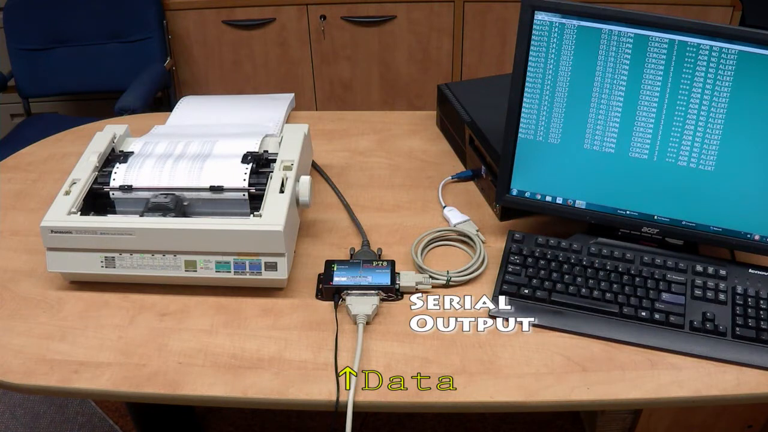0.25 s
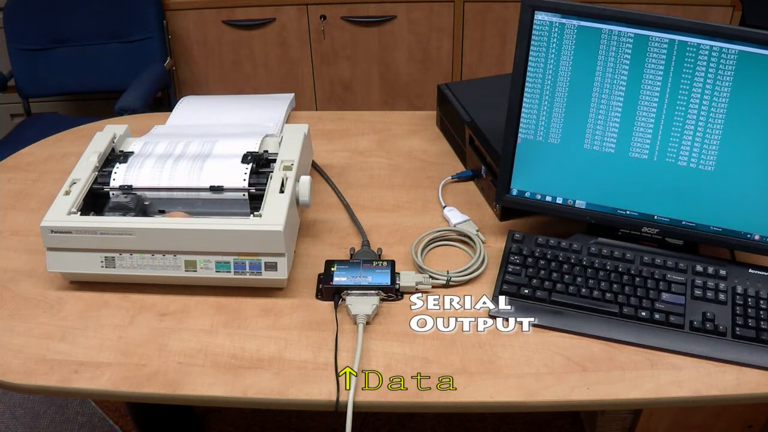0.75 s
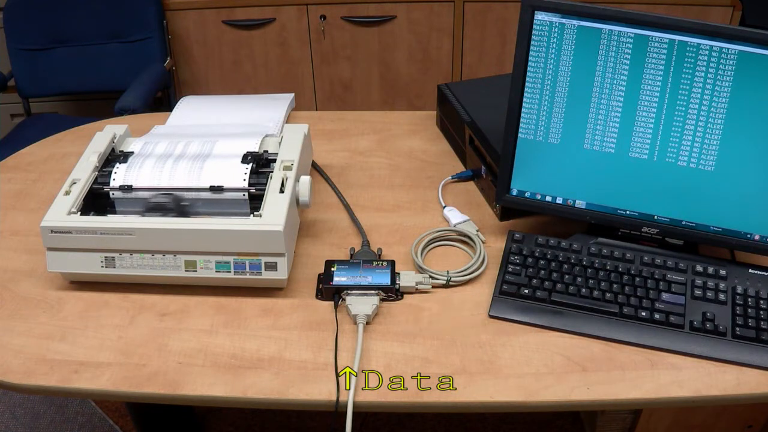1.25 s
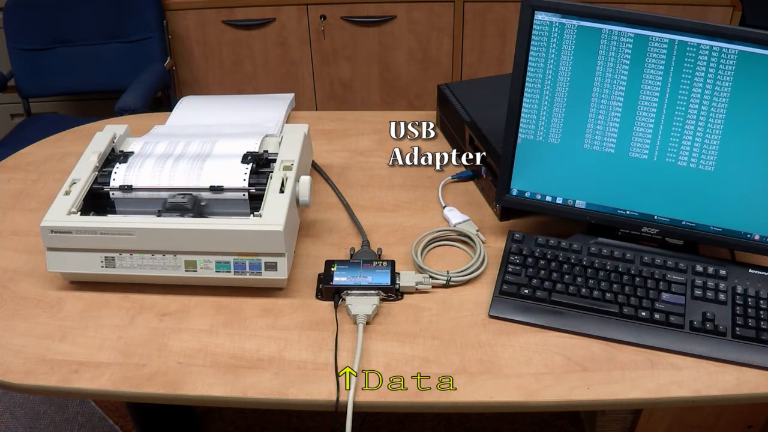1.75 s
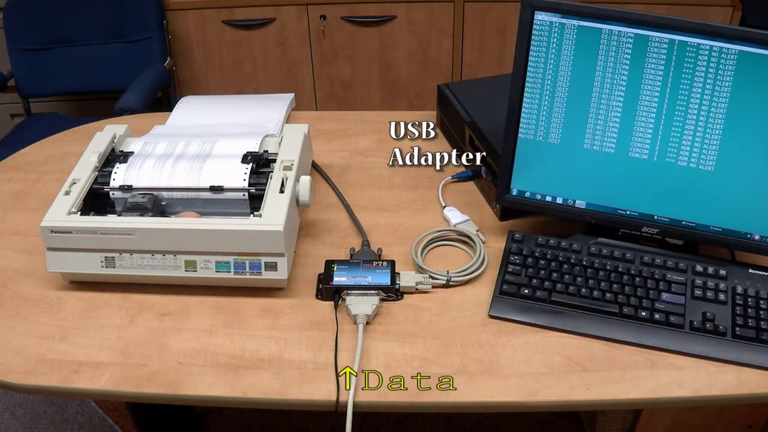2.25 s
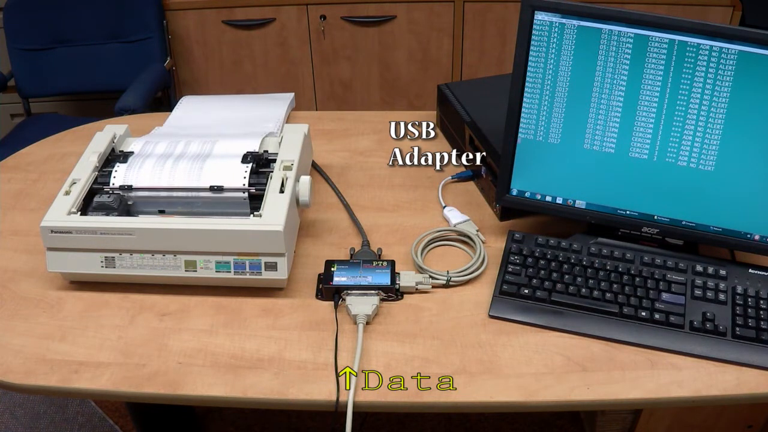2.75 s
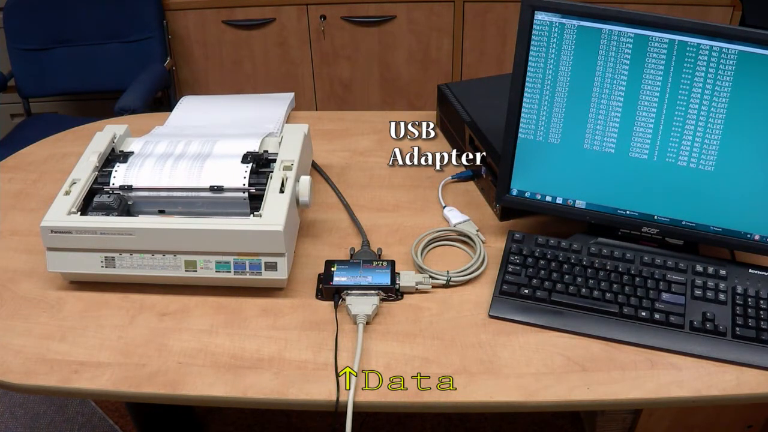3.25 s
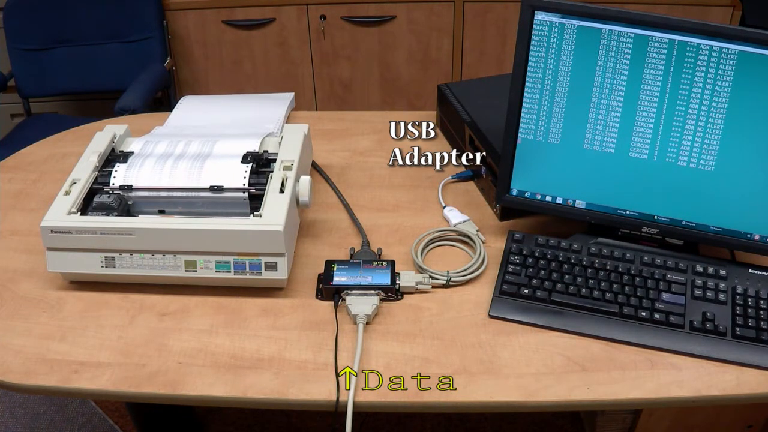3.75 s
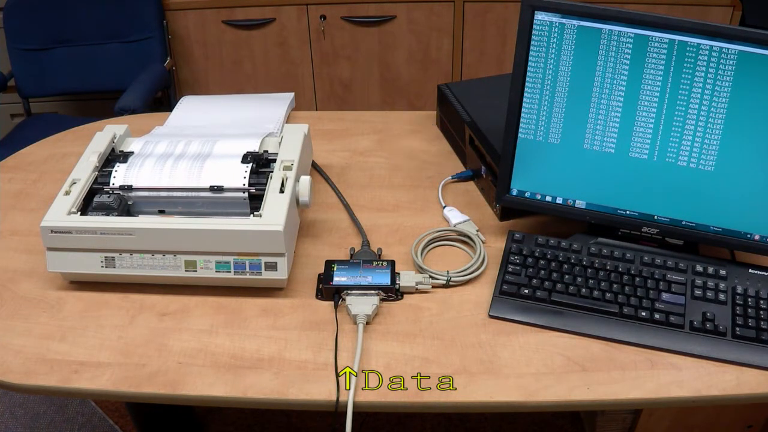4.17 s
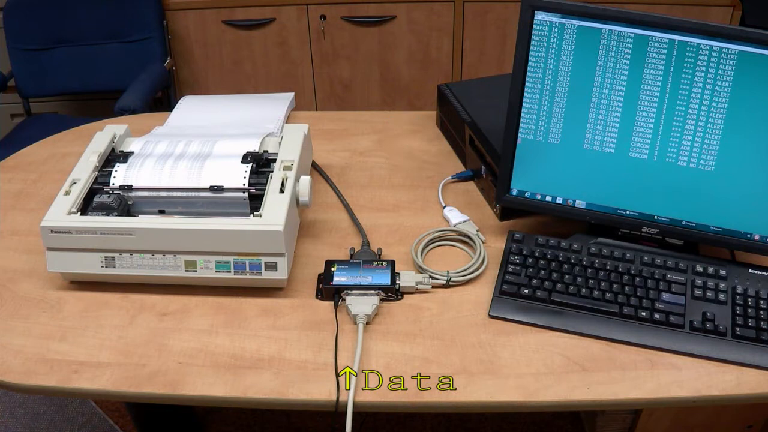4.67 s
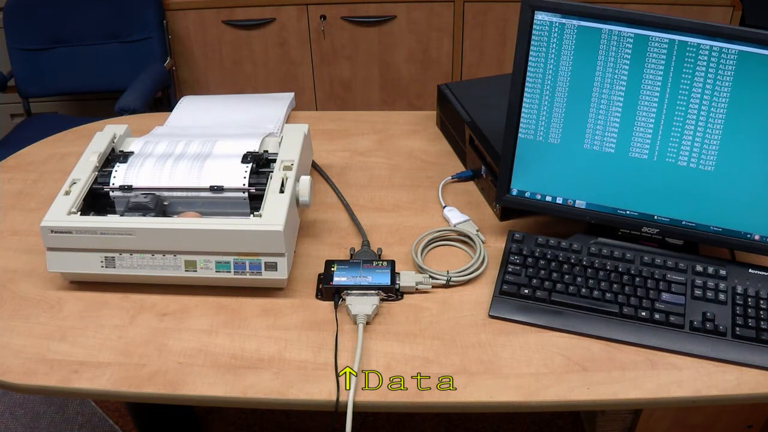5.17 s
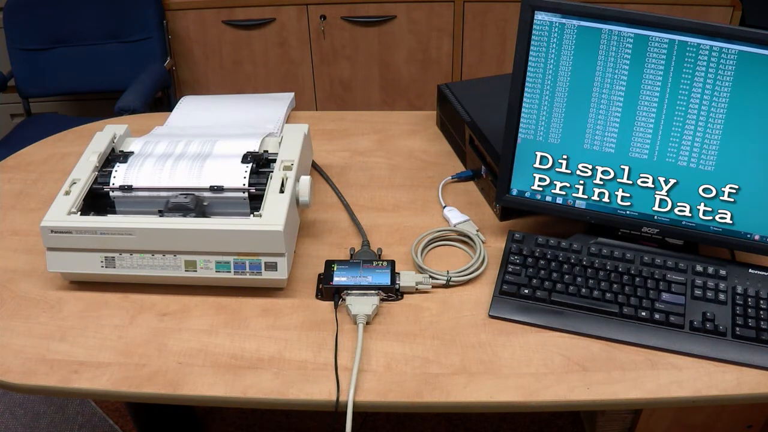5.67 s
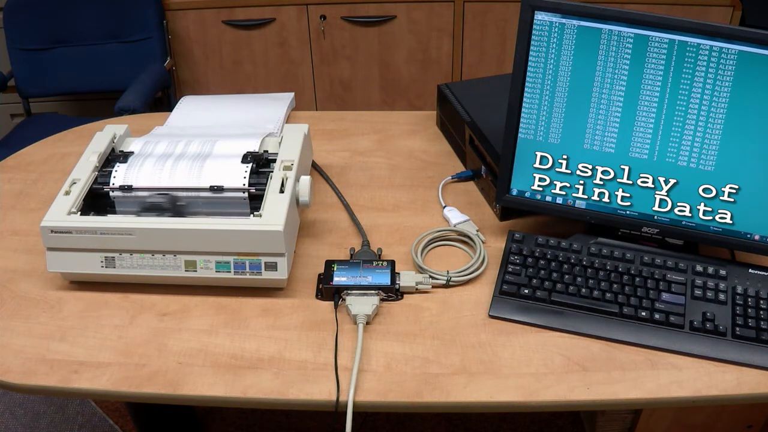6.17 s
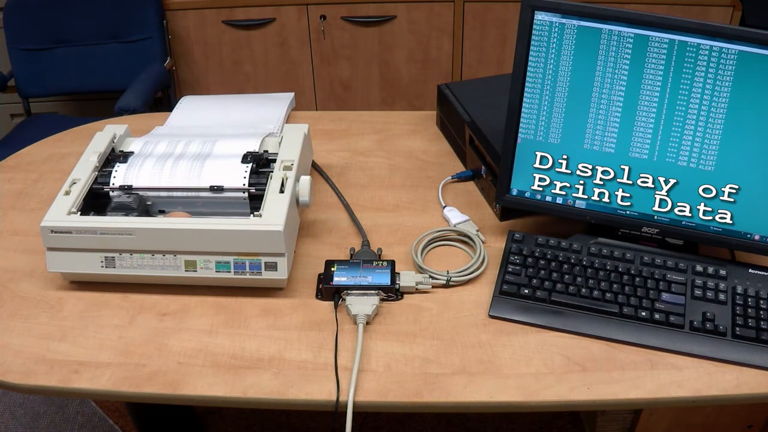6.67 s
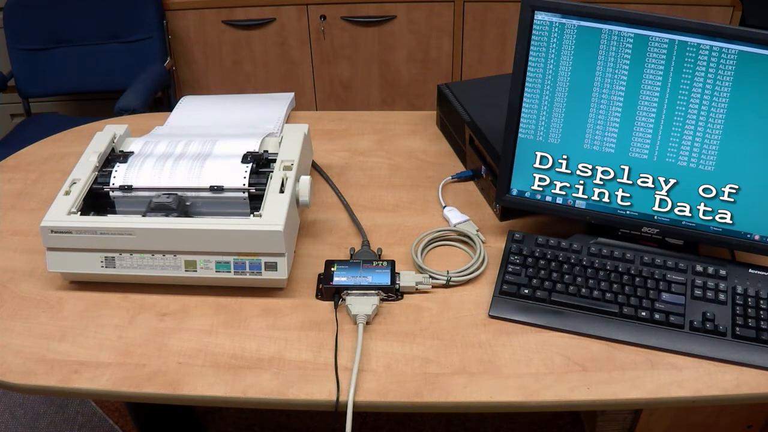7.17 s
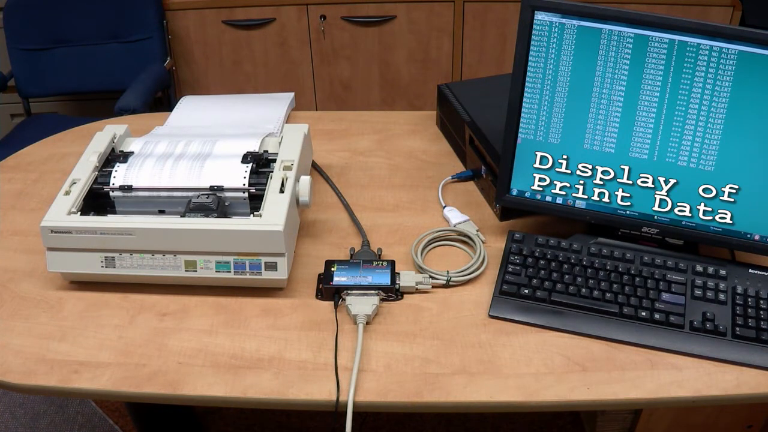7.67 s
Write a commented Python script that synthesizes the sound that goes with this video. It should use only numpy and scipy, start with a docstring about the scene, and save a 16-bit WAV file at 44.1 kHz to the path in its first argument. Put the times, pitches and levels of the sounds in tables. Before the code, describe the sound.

A dot matrix printer, slightly left in a small office, prints two lines in shrill buzzing word-length bursts over a steady motor hum. Between them the carriage runs back with a thud, rustle and higher whine. After the second line only ventilation and faint mains hum remain for about two seconds; then two more lines follow with another heavier return, ending on a thud and clicks. Close stereo microphone, short room reverb, level ducking under the loud pins.

```python
"""Pins of a dot matrix printer, left of centre, hammer out four lines of text over a humming carriage stepper.
After the first and third lines the carriage runs back with rustle and drone; its starts, turns and stops thud in
the chassis and desk, with small plastic ticks. Ventilation noise and mains hum run throughout and fill the pause
after the second line. The room answers the printer; a gain control lowers the level while the pins are loud."""
import sys
import numpy as np
from scipy import signal
from scipy.fft import rfft, irfft, next_fast_len
from scipy.io import wavfile
from scipy.ndimage import uniform_filter1d, minimum_filter1d, map_coordinates

SR = 44100
rng = np.random.default_rng(int(sys.argv[2]) if len(sys.argv) > 2 else 0)


def materialize(psi):
    """Save the field psi as 16-bit PCM at rate SR to the path in sys.argv[1].

    A 1-D psi becomes a single channel; in a 2-D psi each row is a channel.
    """
    bounded = np.clip(np.atleast_2d(psi).T, -1, 1)
    quanta = np.round(bounded * 32767).astype(np.int16)
    wavfile.write(sys.argv[1], SR, quanta)


N = 350154
T = np.arange(N) / SR


def amp(db):
    """Gain of a level in dB."""
    return 10 ** (np.asarray(db) / 20)


def unit(x):
    """Scaled to rms 1."""
    return x / np.sqrt(np.mean(x ** 2) + 1e-20)


def along(points, hz):
    """(freq_hz, value) points read on a log frequency axis."""
    f, v = np.transpose(points)
    return np.interp(np.log(hz + 1), np.log(f + 1), v)


def wobble(knots_per_s):
    """A smooth random curve through normal random knots."""
    knots = rng.standard_normal(2000)
    return map_coordinates(knots, [T * knots_per_s])


def filtered(x, response):
    """x times a complex response of frequency."""
    m = next_fast_len(N + 8192)
    return irfft(rfft(x, m) * response(np.fft.rfftfreq(m, 1 / SR)), m)[..., :N]


def struck(x, spectrum):
    """x through the minimum-phase response of energy 1 with this colour."""
    cep = irfft(np.log(amp(along(spectrum, np.fft.rfftfreq(4096, 1 / SR))) + 1e-4))
    cep[1:2048] *= 2  # fold the cepstrum: causal
    cep[2049:] = 0
    h = irfft(np.exp(rfft(cep)))
    return signal.fftconvolve(np.atleast_2d(x), h[None] / np.linalg.norm(h), axes=1)[:, :N]


def pulses(times_s, sizes):
    """Sharp pulses placed between samples by a windowed sinc."""
    at = times_s[:, None] * SR
    taps = np.floor(at) + np.arange(-7, 9)
    shape = np.sinc(taps - at) * np.cos(np.pi * (taps - at) / 17) ** 2
    index = np.clip(taps, 0, N).astype(int)
    return np.bincount(index.ravel(), (sizes[:, None] * shape).ravel(), N + 1)[:N]


def noise(spectrum, channels=1):
    """Coloured noise of rms 1."""
    white = rng.standard_normal((channels, N))
    return unit(filtered(white, lambda hz: amp(along(spectrum, hz))))


COLUMN_HZ = 1925.7
CHARACTER_COLUMNS = 30
EDGE_DIP_DB, EDGE_SHARE = 2, .25  # fewer dots where two characters meet
WEIGHT_DB, COLOUR_DB = 2.17, 3  # spread of ring and of knocks from character to character
TRAIL_S, TRAIL_DB = .012, -8.5  # rear pins finish after the front ones
FIRST_DB, FIRST_S = -1, 0.002  # softer first columns: offset, decay time constant
# printed words and marks; knocks on every and every second column:
# start_s, end_s, pin_ring_db, every_knock_db, second_knock_db, guide_ring_db
PRINTED_WORDS = [(0, 0.047, -26, -52.5, -53, -44.5), (0.062, 0.111, -27.5, -50.5, -55.5, -50.5),
                 (0.155, .171, -24, -52, -52, -48), (0.198, .278, -22.5, -51.5, -47, -50.5),
                 (0.272, .3, -26.5, -52, -47.5, -54.5), (.371, .434, -22.5, -60, -44, -49.5),
                 (0.436, 0.449, -25, -55.5, -48, -49), (0.45, 0.529, -22.5, -46.5, -50.5, -49),
                 (0.651, 0.707, -21.5, -49.5, -45.5, -55.5), (0.737, .741, -25, -49, -52, -61),
                 (.747, .775, -24, -47, -58.5, -54.5), (0.794, 0.802, -28.5, -52.5, -55.5, -57.5),
                 (0.799, 0.874, -24, -51.5, -53.5, -48.5), (1.572, 1.653, -24.5, -59, -52, -52),
                 (1.672, 1.711, -24.5, -49, -49.5, -55.5), (1.713, 1.764, -24, -51, -51.5, -52.5),
                 (1.78, 1.824, -23.5, -46.5, -50.5, -52), (1.873, 1.885, -19, -47.5, -41, -45),
                 (1.915, 2.013, -24, -53.5, -48, -45.5), (2.089, 2.148, -21, -48.5, -46, -46),
                 (2.159, 2.254, -23, -46.5, -55, -52), (2.37, 2.431, -22.5, -55.5, -48, -62),
                 (2.454, 2.459, -22, -53, -66, -60), (2.464, 2.471, -22.5, -40, -47, -50.5),
                 (4.841, 4.886, -24, -62.5, -70, -73), (4.887, 4.924, -27.5, -63.5, -59, -53.5),
                 (4.939, 4.977, -29, -60, -61.5, -60), (5.001, 5.065, -28.5, -55.5, -62, -55.5),
                 (5.187, 5.218, -24.5, -60, -66, -59), (5.224, 5.265, -25.5, -57, -61.5, -61),
                 (5.269, 5.347, -25, -59, -54, -50.5), (5.421, 5.525, -23, -53, -53, -48.5),
                 (5.548, 5.564, -22, -56, -50.5, -44.5), (5.611, 5.657, -20, -39.5, -59.5, -41.5),
                 (5.676, 5.724, -20, -43, -52.5, -44), (5.732, 5.768, -21.5, -47, -51, -56),
                 (5.775, 5.86, -21, -54, -45.5, -54.5), (6.567, 6.6, -23, -65, -63, -55),
                 (6.604, 6.651, -27, -63.5, -57, -59), (6.665, 6.695, -27.5, -65.5, -56.5, -63),
                 (6.728, 6.787, -28, -61, -60, -58), (6.912, 6.955, -27.5, -64.5, -61.5, -69),
                 (6.959, 7.072, -25, -51.5, -59.5, -50.5), (7.147, 7.246, -23, -55.5, -55.5, -48.5),
                 (7.271, 7.288, -27, -58.5, -53, -60), (7.336, 7.384, -24.5, -49, -65.5, -46),
                 (7.391, 7.444, -20.5, -49, -49, -48.5), (7.459, 7.488, -20, -55.5, -51, -52),
                 (7.502, 7.58, -21, -50.5, -47, -52)]


def text(times_s):
    """Gains of ring and knocks per column: words of equal character cells, with a weak trail."""
    gains = np.zeros((4, len(times_s)))
    weights = rng.standard_normal((len(PRINTED_WORDS), 4, 12))
    spread_db = np.c_[[WEIGHT_DB, COLOUR_DB, COLOUR_DB, COLOUR_DB]]
    for (start, end, *db), weight in zip(PRINTED_WORDS, weights):
        on = (times_s >= start) & (times_s < end + TRAIL_S)
        t = times_s[on]
        cells = (t - start) * COLUMN_HZ / CHARACTER_COLUMNS
        edge = np.clip((cells % 1 - 1 + EDGE_SHARE) / EDGE_SHARE, 0, 1)
        shape_db = FIRST_DB * np.exp((start - t) / FIRST_S)
        shape_db = shape_db - EDGE_DIP_DB * np.sin(np.pi * edge) + TRAIL_DB * (t >= end)
        gains[:, on] = amp(np.add.outer(db, shape_db) + spread_db * weight[:, cells.astype(int)])
    return gains


# pin and head ring colour: freq_hz, density_db
HEAD_RING = [(1200, -36), (2500, -28.5), (4000, -22.5), (5200, -15), (6400, -13.5), (7200, -6.5),
             (7800, -0.5), (8500, -7), (9600, -10.5), (11000, -12), (12500, -11.5), (14000, -12.5),
             (16000, -17.5)]
# platen knock colour: freq_hz, level_db
PLATEN_KNOCK = [(300, -10.5), (640, -6), (1000, -3), (1400, 0.5), (1930, -2.5), (2400, 3), (2890, -11.5),
                (3400, -1), (3850, 1), (6000, -16.5)]
# paper guide ring colour: freq_hz, level_db
PAPER_GUIDE = [(2000, -39), (2650, -15.5), (2880, 6.5), (3100, -18.5), (4000, -43)]
FLIGHT_JITTER_S, REBOUND_S = 1.9e-5, 0.0014


def pins():
    """Pins fire on the column clock, as many as the letter shapes need; each rattles as it rebounds."""
    times_s = np.arange(int(N / SR * COLUMN_HZ)) / COLUMN_HZ
    ring, every, second, guide = text(times_s)
    per_column = np.sqrt(SR / COLUMN_HZ)
    draw = rng.standard_normal((len(times_s), 6))
    # upright strokes fire many pins at once, never more than the head has
    stroke_db = 3.2 * np.tanh(1.5 * unit(uniform_filter1d(draw[:, 0], size=3)))
    fired = ring * amp(stroke_db) * per_column

    # unequal flight times blur the clock's upper overtones
    flight_s = FLIGHT_JITTER_S * draw[:, 1]
    force = 1 + 0.55 * np.tanh(0.27 * draw[:, 2])
    blows = amp(4.5) * pulses(times_s + flight_s, fired * force)
    spread = signal.lfilter([1], [1, -np.exp(-1 / (REBOUND_S * SR))], pulses(times_s, fired))
    shared, *own = rng.standard_normal((3, N))
    # rattling parts face the two ports differently
    rattle = amp(-14.5) * spread * (shared + 0.58 * np.array(own))

    # a pin cannot fire on neighbouring columns: flat strokes beat at half the clock,
    # letter shapes shift the beat by one column now and then
    parity = np.cumprod(np.where(draw[:, 4] < 1.7, -1, 1))
    beat = amp(12.5) * every + amp(16) * second * parity
    uneven = amp(12.0) * np.hypot(every, second) * draw[:, 3]
    knock = struck(pulses(times_s, per_column * (beat + uneven)), PLATEN_KNOCK)
    flutter = parity + 1.3 * draw[:, 5]
    sheet = struck(pulses(times_s, per_column * amp(-1.5) * guide * flutter), PAPER_GUIDE)
    return struck(blows + rattle, HEAD_RING) + knock + sheet


# carriage stepper passes: start_s, end_s, step_rate_hz, hum_db, whine_db, whirr_db
CARRIAGE_PASSES = [(-.1, 0.981, 648.6, -51, -78, -53), (1.097, 1.44, 485, -54, -53.5, -55),
                   (1.481, 2.584, 648, -49.5, -81.5, -52.5), (4.76, 5.964, 628.3, -46.5, -75, -52),
                   (6.04, 6.433, 482, -50.5, -52.5, -53), (6.458, 7.695, 652.4, -47, -76, -53.5)]
# gear whirr colour: freq_hz, density_db
GEAR_WHIRR = [(120, -22.5), (200, -3.5), (400, -1.5), (800, -8.5), (1500, -19.5), (3000, -33),
              (6000, -21.5), (9000, -22), (14000, -37.5)]
# belt and ribbon rustle colour, also weights the whine overtones: freq_hz, density_db
BELT_RUSTLE = [(700, -28.5), (1400, -9.5), (2400, -10.5), (3500, -16), (5500, -13.5), (8000, -4),
               (9900, -10), (13900, -10.5), (15500, -24.5)]
PULL_DB, PULL_S = 3, .08  # louder hum while getting up to speed: boost, decay time constant
RAMP_S, BRAKE_S, BRAKE_SHARE = 0.0067, 0.05, .18


def stepper():
    """Motor hum at the step rate, a whine of step overtones 12 to 18, and gear whirr."""
    out = np.zeros(N)
    drift_rad, swell, whirr = 0.59 * wobble(25), amp(2.2 * wobble(9.1)), noise(GEAR_WHIRR)[0]
    orders = np.arange(18, 11, -1)
    for start, end, hz, hum_db, whine_db, whirr_db in CARRIAGE_PASSES:
        at = (T > start) & (T < end)
        t = T[at]
        on = np.clip(np.minimum(t - start, end - t) / RAMP_S, 0, 1)
        speed = 1 - BRAKE_SHARE * np.clip(1 - (end - t) / BRAKE_S, 0, 1)  # brakes at the end
        step = np.exp(1j * (2 * np.pi * hz * np.cumsum(speed) / SR + drift_rad[at]))
        hum = step + amp(-24.0) * step ** 2 + amp(-27) * step ** 3
        whine = step ** 12 * np.polyval(amp(along(BELT_RUSTLE, hz * orders)), step)
        hum_gain = amp(hum_db + PULL_DB * np.exp((start - t) / PULL_S))
        tone = (hum_gain * hum + amp(whine_db) * whine).real
        out[at] += on * (swell[at] * tone + amp(whirr_db) * whirr[at])
    return out


# ventilation colour: freq_hz, density_db
VENT_AIR = [(15, -28), (30, -15), (45, -18.5), (59, -6), (74, -12), (93, -7), (110, -13), (132, 0),
            (185, -14), (300, -20.5), (500, -27.5), (950, -37), (1300, -47), (2500, -62)]
VENT_DB = -46.5
# left-right likeness of the ventilation: freq_hz, correlation
VENT_LIKENESS = [(60, 1), (240, 0.81), (950, 0.43), (3770, 0.07), (15000, 0.01)]
# mains hum overtones: freq_hz, level_db
MAINS_HUM = [(240, -58.5), (360, -64.5)]


def ventilation():
    """Noise rumble, nearly mono in the bass and wide in the treble, with faint mains overtones."""
    turn = lambda hz: np.arccos(np.clip(along(VENT_LIKENESS, hz), -1, 1)) / 2
    mid_side = lambda hz: np.array([np.cos(turn(hz)), np.sin(turn(hz))])
    mid, side = filtered(noise(VENT_AIR, channels=2), mid_side)
    hum = 0
    for hz, db in MAINS_HUM:
        hum = hum + amp(db + 1.1 * wobble(8.8)) * np.sin(2 * np.pi * hz * T + .3 * wobble(2.3))
    level = amp(VENT_DB + 0.37 * wobble(1.6))
    return level * np.array([mid + side, mid - side]) + np.sqrt(2) * hum


# room decay: freq_hz, t60_s, level_db
ROOM_DECAY = [(100, .4, -26.5), (500, 0.341, 1), (1272, 0.33, -2.5), (3526, 0.2, -3), (9130, 0.21, -8.5),
              (15000, 0.13, -10.5)]


def office(x):
    """Each frequency of the room's answer dies at its own speed; a fresh random tail every third of a second."""
    out = np.zeros((2, N + SR))
    step, delay = SR // 3, 130  # samples
    modes = np.array(ROOM_DECAY)
    for at in range(0, N, step):
        hz, t, z = signal.stft(rng.standard_normal((2, step)), SR, nperseg=256)
        t60 = along(modes[:, :2], hz)[:, None]
        level_db = along(modes[:, ::2], hz)[:, None]
        scale = np.sqrt(2 * np.log(1000) / (t60 * SR))  # energy 1 before the level
        tail = signal.istft(z * amp(level_db - 60 * t / t60) * scale, SR, nperseg=256)[1]
        wet = signal.fftconvolve(x[None, at:at + step], tail, axes=1)
        out[:, at + delay:at + delay + wet.shape[1]] += wet
    return out[:, :N]


# carriage runs back: start_s, end_s, rustle_db, drone_db
RUNS_BACK = [(.99, 1.47, -50, -51.5), (5.97, 6.477, -45.5, -52)]
# drive takes up or drops its load: peak_s, rustle_db, drone_db, hold_s, fade_t60_s
LOAD_JOLTS = [(1.003, -42.5, -41, .11, 0.27), (1.464, -37.5, -33.5, .03, 0.13),
              (1.504, -52.5, -38.5, .065, 0.098), (2.597, -40, -42, 0.089, 0.092),
              (4.748, -37, -30, 0.019, .12), (4.796, -49, -35, 0.052, 0.1),
              (5.992, -38.5, -35.5, 0.031, 0.37), (6.439, -36.5, -30, .03, 0.11),
              (6.487, -46.5, -33.5, .075, 0.067), (7.707, -43.5, -39.5, .125, .08),
              (7.764, -33.5, -59, .015, 0.087)]
# chassis drone colour: freq_hz, density_db
CHASSIS_DRONE = [(50, -25), (90, -11), (200, 0.5), (320, -11), (390, -1.5), (450, -14.5), (600, -3.5),
                 (800, -16.5), (1500, -27), (3000, -45), (5000, -58.5)]
JOLT_RISE_DB_PER_S, RUSTLE_SAG_DB_PER_S, DRONE_SAG_DB_PER_S = 698, 37, 15


def drive():
    """Belt and ribbon rustle in fine grains while the chassis drones; both flare when the load changes."""
    power = np.zeros((2, N))
    for start, end, *db in RUNS_BACK:
        on = np.clip(np.minimum(T - start, end - T) / 0.012, 0, 1)
        power += np.outer(amp(db), on) ** 2
    for peak, rustle_db, drone_db, hold, t60 in LOAD_JOLTS:
        held = np.clip(T - peak, 0, hold)
        rise_db = -JOLT_RISE_DB_PER_S * np.maximum(peak - T, 0)
        edges_db = rise_db - 60 * np.maximum(T - peak - hold, 0) / t60
        rustle_jolt_db = rustle_db + edges_db - RUSTLE_SAG_DB_PER_S * held
        drone_jolt_db = drone_db + edges_db - DRONE_SAG_DB_PER_S * held
        power += amp([rustle_jolt_db, drone_jolt_db]) ** 2
    rustle, drone = np.sqrt(power)
    grain = amp(2.5 * wobble(160) + 1.1 * wobble(30))
    rustling = rustle * unit(grain * noise(BELT_RUSTLE)[0])
    return rustling + drone * amp(2.9 * wobble(40)) * noise(CHASSIS_DRONE)[0]


# carriage starts, turns or stops: start_s, thud_db, swell_s, desk_boom_db, cover_ring_db
CARRIAGE_THUDS = [(1.001, -19.5, 0.043, -37, -31.5), (1.451, -22.5, 0.03, -33.5, -41.5),
                  (2.582, -57, .015, -43, -61), (4.73, -20, 0.024, -35.5, -21.5),
                  (5.982, -28, 0.0175, -36, -30.5), (6.429, -15.5, 0.043, -26.5, -16),
                  (7.72, -30, 0.014, -44, -42)]
# chassis modes: freq_hz, level_db, t60_s
CHASSIS_MODES = [(150, -3.5, 0.22), (246.8, -5.5, 0.301), (560, -21.5, 0.14), (810, -14, .08),
                 (1238, -23.5, .06), (2330, -23.5, .05)]
# desk boom: freq_hz, swell_s, t60_s
DESK_BOOM = (87, 0.015, 0.99)
# cover buzz: freq_hz, hold_s, t60_s
COVER_BUZZ = (390, 0.041, 0.033)
# small plastic contacts: start_s, level_db, body_db
PLASTIC_TICKS = [(1.0176, -29, -7), (1.4626, -37, -11), (2.589, -38, -0.5), (2.6691, -34, -10),
                 (2.9298, -52, 0), (2.9697, -70, -2), (4.7356, -21, -19), (6.0018, -13.5, -18.5),
                 (6.1888, -36, -9.5), (6.4428, -31, -3), (7.7608, -17.5, -45), (7.7738, -30.5, -29)]
# tick crack colour: freq_hz, density_db
TICK_CRACK = [(700, -35.5), (2000, -19), (4000, -6), (8000, -0.5), (12000, -8), (15500, -19)]


def knocks():
    """Thuds swell into chassis modes, cover and desk; ticks are short cracks over a duller body."""
    out, t = np.zeros(N + SR), T[:SR // 2]
    desk_hz, desk_swell, desk_t60 = DESK_BOOM
    cover_hz, cover_hold, cover_t60 = COVER_BUZZ
    boom = amp(-60 * t / desk_t60) * (1 - np.exp(-(t / desk_swell) ** 2))
    boom = boom * np.sin(2 * np.pi * desk_hz * t)
    cover = amp(-60 * np.maximum(t - cover_hold, 0) / cover_t60) * np.sin(2 * np.pi * cover_hz * t)
    for s, db, swell, boom_db, cover_db in CARRIAGE_THUDS:
        ring = 0
        for hz, level_db, t60 in CHASSIS_MODES:
            decay = amp(level_db + rng.normal(0, 2.5) - 60 * t / t60)
            ring = ring + decay * np.sin(2 * np.pi * (hz * t + rng.random()))
        onset = 1 - np.exp(-(t / swell) ** 2)
        thud = (amp(db) * ring + amp(cover_db) * cover) * onset
        out[round(s * SR):][:len(t)] += thud + amp(boom_db) * boom

    bright = np.tile(noise(TICK_CRACK)[0], 2)
    dull = np.tile(noise([(150, -23), (450, 7), (1200, -4), (2800, -8.5), (5000, -23.5)])[0], 2)
    for s, db, body_db in PLASTIC_TICKS:
        at = slice(round(s * SR), round(s * SR) + len(t))
        crack = amp(-60 * t / 0.004) * bright[at]
        body = amp(body_db + 10 - 60 * t / 0.041) * dull[at]
        out[at] += amp(db - 4.5) * (crack + body)
    return out[:N]


# left port louder than right: freq_hz, difference_db
LEFT_LOUDER = [(60, 2.5), (900, 0), (2400, -0.5), (5000, 6.5), (6500, 10.5), (8500, 4), (12000, 1),
               (15000, 1)]
# left port ahead of right: freq_hz, lead_rad
LEFT_LEAD = [(100, 0), (2000, .35), (5000, 1.0), (7500, .5), (10000, 1.2), (15000, 2.9)]


def scene():
    """The printer reaches the left port first; the room answers its bright part, ventilation surrounds it."""
    printer = pins() + stepper() + drive() + knocks()
    # half of the level and phase difference on each port
    port = lambda hz: amp(along(LEFT_LOUDER, hz) / 2) * np.exp(.5j * along(LEFT_LEAD, hz))
    direct = filtered(printer, lambda hz: np.array([port(hz), 1 / port(hz)]))
    bright = filtered(printer.mean(axis=0), lambda hz: hz ** 4 / (hz ** 4 + 750 ** 4))
    return direct + office(bright) + ventilation()


def recover(cut_db, seconds):
    """A gain cut sets in at once and fades away exponentially."""
    return np.exp(np.maximum.accumulate(np.log(cut_db) + T / seconds) - T / seconds)


# microphone noise colour: freq_hz, density_db
MIC_HISS = [(1200, -37), (2000, -15.5), (3700, -41), (5200, -27), (6500, -16), (9000, -12), (14000, -5.5),
            (14600, -14), (16000, -36)]
HISS_DB, TOP_HZ = -64.5, 15800


def record(dry):
    """Microphone hiss, look-ahead gain control with quick and held stages, soft peaks, band limit."""
    x = dry + amp(HISS_DB) * noise(MIC_HISS, channels=2)
    level_db = 10 * np.log10(np.abs(uniform_filter1d(np.mean(x ** 2, 0), size=400)) + 1e-12)
    loud = 1 / (1 + np.exp(-(level_db + 30.0) / 2.5))
    # running maxima: ahead, then back
    loud = -minimum_filter1d(-loud, size=301, origin=-150)
    held = -minimum_filter1d(-loud, size=16001, origin=8000)
    cut_db = recover(5 * loud, seconds=0.18) + recover(5.68 * held, seconds=0.092)
    x = x * amp(-uniform_filter1d(cut_db, size=200))
    x = x / (1 + (x / .8) ** 4) ** .25
    return filtered(x, lambda hz: hz < TOP_HZ)


dry = scene()
out = record(dry)
materialize(out)
```